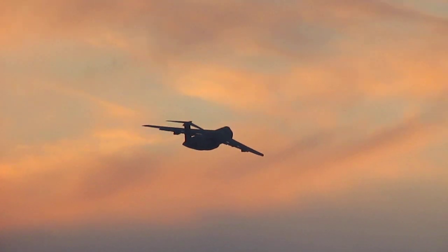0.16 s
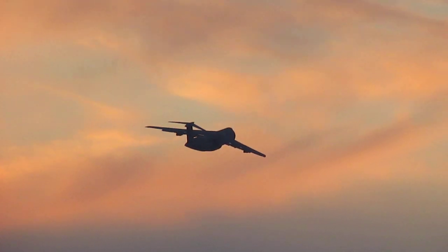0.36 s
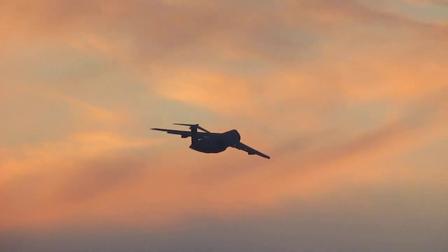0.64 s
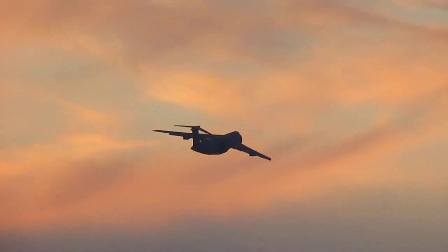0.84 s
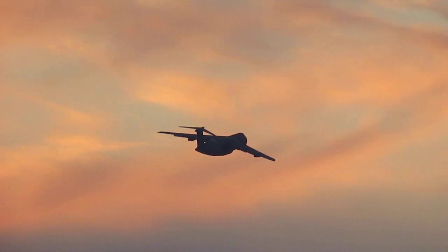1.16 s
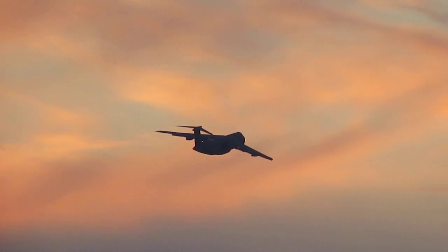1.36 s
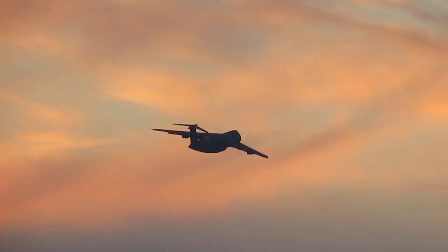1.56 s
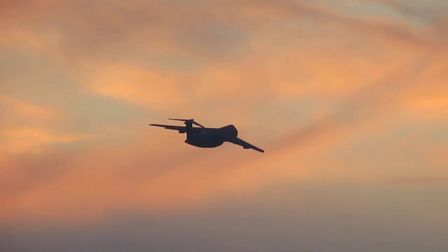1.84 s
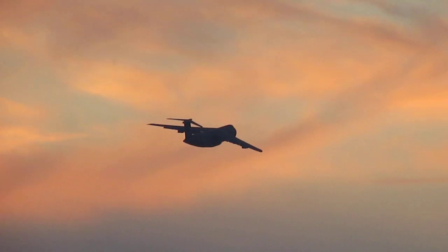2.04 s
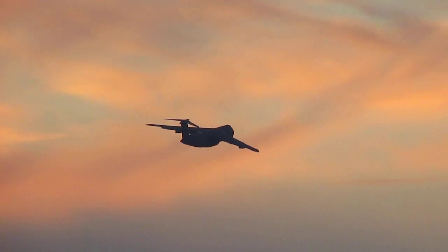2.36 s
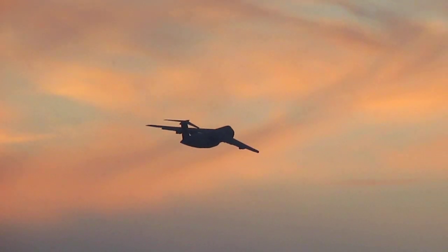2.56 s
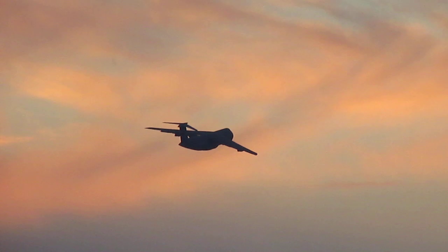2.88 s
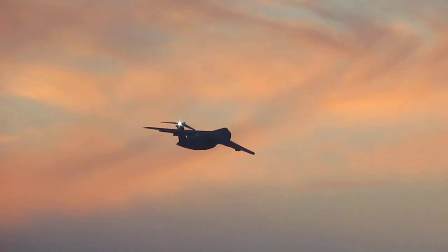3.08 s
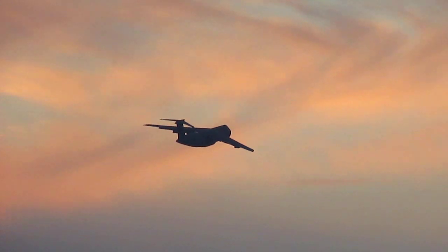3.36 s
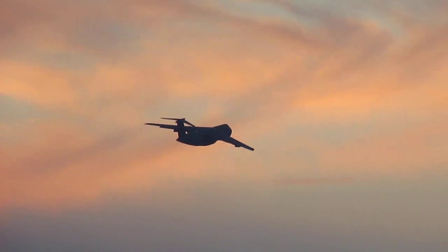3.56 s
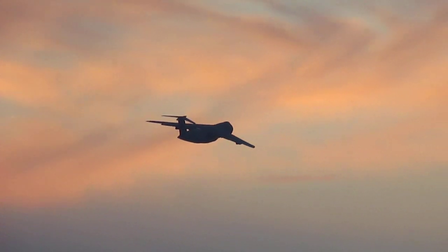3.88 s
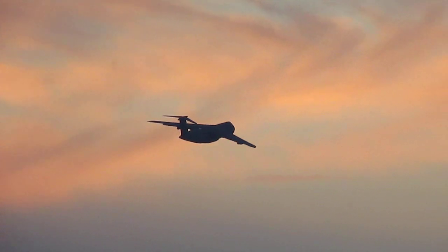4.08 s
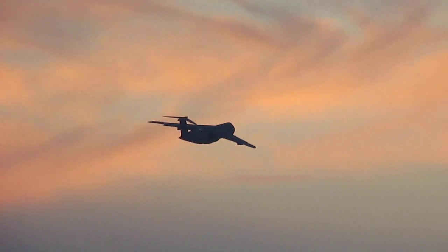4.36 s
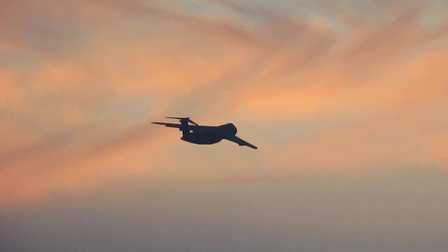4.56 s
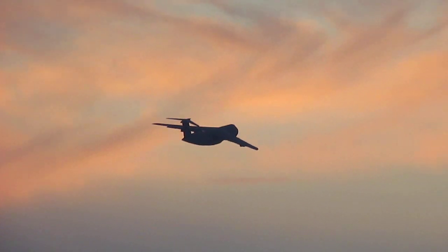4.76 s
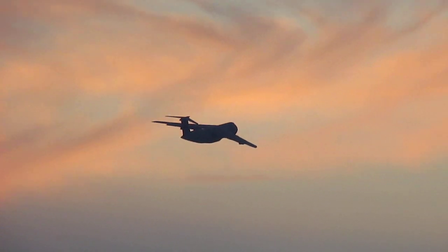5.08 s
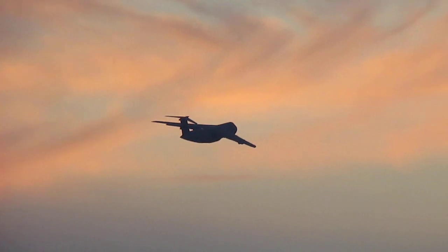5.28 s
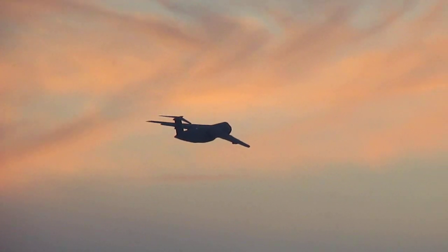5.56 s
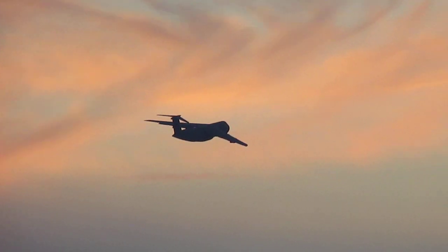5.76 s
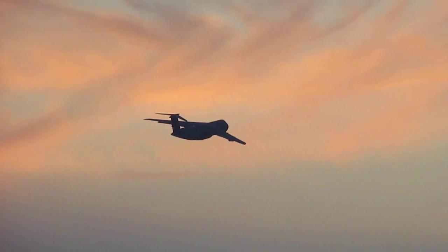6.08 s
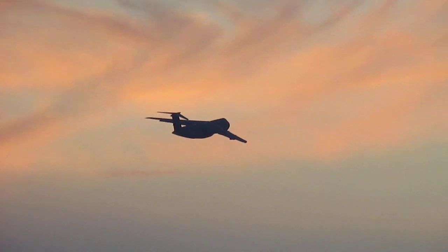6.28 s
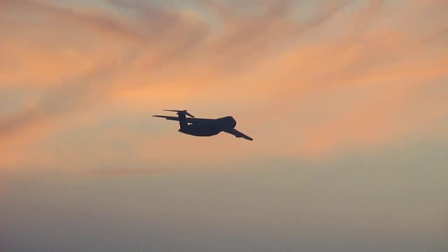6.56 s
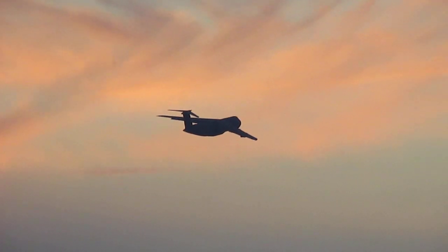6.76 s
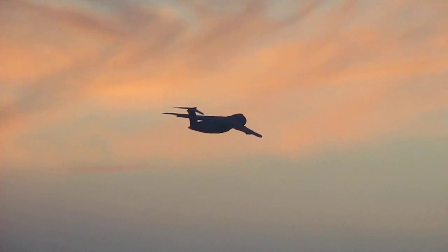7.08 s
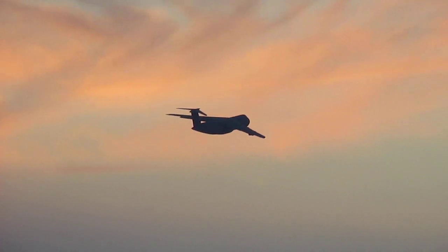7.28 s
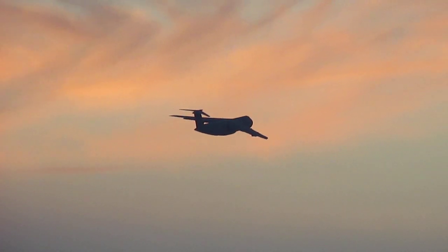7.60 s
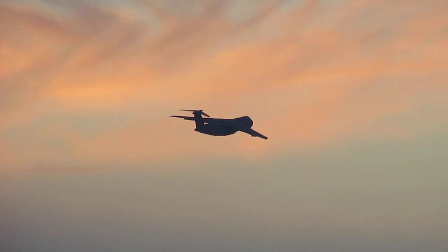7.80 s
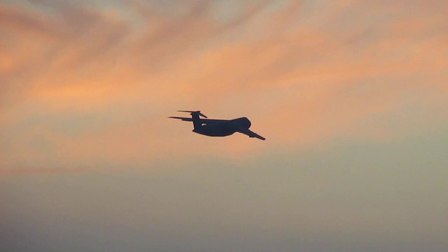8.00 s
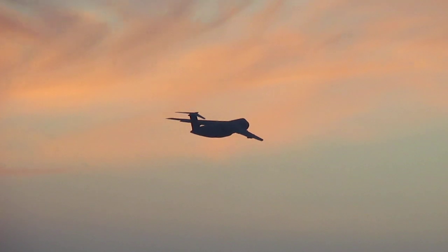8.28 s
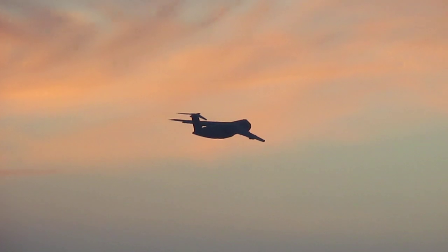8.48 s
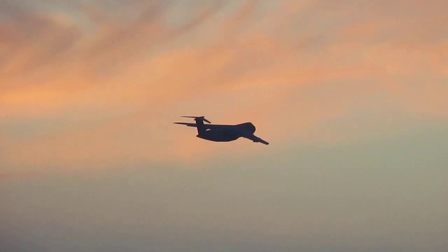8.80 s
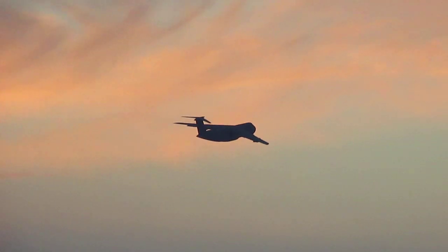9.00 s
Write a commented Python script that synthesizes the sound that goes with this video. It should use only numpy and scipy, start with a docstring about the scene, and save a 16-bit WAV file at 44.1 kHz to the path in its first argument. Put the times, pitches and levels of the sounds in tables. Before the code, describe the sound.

A big jet climbs away with a dull roar, deep rumble and faint whine, while wind gusts buffet the microphone.

```python
"""Jet climbing away at dusk

A big four-engine jet leaves an airfield: its dull exhaust roar and faint fan whine swell and recede,
leaving a distant hiss. Gusts buffet the microphone, the hardest ducking its gain control. A breeze
hisses through dry grass, in which stalks tick and crickets buzz. The hand-held camera knocks and clicks."""
import sys
import numpy as np
from scipy import signal
from scipy.fft import rfft, irfft, next_fast_len
from scipy.io import wavfile
from scipy.ndimage import uniform_filter1d

SR = 44100
rng = np.random.default_rng(int(sys.argv[2]) if len(sys.argv) > 2 else 0)


def dump_mix(stems):
    """Bounce the given channels to the path in sys.argv[1] as a 16-bit WAV at rate SR."""
    frames = np.atleast_2d(stems).T  # one column per channel
    limited = np.clip(frames, -1, 1)  # hard clip at full scale
    pcm = np.round(limited * 32767).astype(np.int16)
    wavfile.write(sys.argv[1], SR, pcm)


N = 403074
TIME = np.arange(N) / SR


def from_db(db):
    """Decibels to gain."""
    return 10 ** (np.asarray(db) / 20)


def rms_one(x):
    """Scale to unit power."""
    return x / np.sqrt(np.mean(x ** 2) + 1e-20)


def swell(peak_s, rise_s, fall_s):
    """Gaussian bell of height 1 with its own rise and fall."""
    return np.exp(-.5 * ((TIME - peak_s) / np.where(TIME < peak_s, rise_s, fall_s)) ** 2)


def panned(pan_db):
    """Stereo gains; pan_db is left minus right."""
    return from_db(np.array([[.5], [-.5]]) * pan_db)


def at_hz(points, hz):
    """Read a table on a log-frequency axis."""
    points_hz, values = np.transpose(points)
    return np.interp(np.log(hz + 1e-3), np.log(points_hz), values)


def drift(rate_hz):
    """Slow random wander; rms 1."""
    pole = np.exp(-80 * np.pi * rate_hz / SR)
    slow = signal.lfilter([1], [1, -2 * pole, pole * pole], rng.standard_normal(N // 40 + 2002))[2000:]
    return np.interp(np.arange(N) / 40, np.arange(len(slow)), rms_one(slow))


def turbulence(colour, coherence, lag_s=0):
    """Stereo noise from (Hz, dB) colour and (Hz, left-right coherence) points, left lag_s late; rms 1."""
    size = next_fast_len(N)
    hz = np.arange(size // 2 + 1) * SR / size
    mid, side = rfft(rng.standard_normal((2, size)))
    alike = np.clip(at_hz(coherence, hz), -1, 1)
    pair = np.sqrt(1 + alike) * mid + np.sqrt(1 - alike) * side * [[1], [-1]]
    pair[0] *= np.exp(-2j * np.pi * hz * lag_s)
    return rms_one(irfft(pair * from_db(at_hz(colour, hz)), size)[:, :N])


def wavering_tone(hz, wander_hz, flutter_db):
    """Machine tone through moving air: pitch wanders, level flutters; rms 1."""
    phase = 2 * np.pi * np.cumsum(hz + wander_hz * drift(5.96)) / SR
    return rms_one(from_db(flutter_db * drift(5.5)) * np.sin(phase))


def blurred_tone(hz, width_hz):
    """Tone broadened by wandering amplitude and phase; rms 1."""
    phase = 2 * np.pi * hz * TIME
    return rms_one(drift(width_hz) * np.cos(phase) + drift(width_hz) * np.sin(phase))


def moving_band(centre_hz, width_hz):
    """Noise band around a moving centre; rms 1."""
    lowpass = signal.butter(2, width_hz / 2, fs=SR, output="sos")
    slow = signal.sosfilt(lowpass, rng.standard_normal((2, N)))
    phase = 2 * np.pi * np.cumsum(centre_hz) / SR
    return rms_one(slow[0] * np.cos(phase) + slow[1] * np.sin(phase))


def decays(events, t60_s, rise_samples):
    """Envelope that rises at each (s, dB) event and dies away."""
    kicks = np.zeros(N)
    for at_s, db in events:
        kicks[min(round(at_s * SR), N - 1)] = from_db(db)
    pole = from_db(-60 / (t60_s * SR))
    return uniform_filter1d(signal.lfilter([1], [1, -pole], kicks + 1e-18), rise_samples)


def exhaust():
    """Large eddies rumble, small ones roar; both swell as their beams sweep by and flutter in the air."""
    # Each row: frequency in Hz, relative density in dB.
    roar_colour = [(150, -10), (330, -0.5), (400, -1.5), (510, 1), (680, -2), (780, -2), (1000, -4.5),
                   (1250, -8.5), (1550, -14.5), (1750, -15), (2100, -25), (3000, -32), (4500, -48.5),
                   (9000, -67.5)]
    rumble_colour = [(15, -24.5), (30, -3), (45, -2), (60, 2.5), (100, -3.5), (125, -0.5), (160, -5),
                     (200, -4), (260, -9.5), (330, -13), (450, -27), (800, -68)]
    # Each row: frequency in Hz, left-right coherence.
    coherence = [(60, 1), (250, 0.96), (450, 0.91), (750, 0.88), (1200, 0.79), (2000, 0.52), (3300, .05)]
    # Faint engine drones. Each row: pitch in Hz, level against the roar in dB.
    drone_tones = [(475, -22.5), (502, -21), (515, -19), (594, -16), (773, -17.5)]
    roar_db = -30 + 2 * swell(peak_s=4.84, rise_s=1.25, fall_s=1.78)
    rumble_db = -27.5 + 6.5 * swell(peak_s=5.3, rise_s=1.58, fall_s=4.0)
    roar = from_db(roar_db + 0.55 * drift(3.9)) * turbulence(roar_colour, coherence, lag_s=9e-5)
    rumble = from_db(rumble_db + 0.42 * drift(7.8)) * turbulence(rumble_colour, coherence, lag_s=8e-5)
    drones = sum(from_db(roar_db + db) * wavering_tone(hz, wander_hz=4.42, flutter_db=3.0)
                 for hz, db in drone_tones)
    return (roar + drones) * panned(0.17) + rumble * panned(1.0)


def fans():
    """Four fans at nearly the same speed beat; their beamed whine sweeps over the listener."""
    # Each row: pitch in Hz, relative level in dB.
    blade_tones = [(1067, -7.5), (1070, -2.5), (1080, -4.5), (1084, -16.5)]
    # Moving air briefly focuses the whine. Each row: time in seconds, half length in seconds, gain in dB.
    focusings = [(2.134, 0.16, 9), (3.2, .2, 3.5), (4.34, 0.1, 6), (5.2, 0.28, 5.5)]
    level_db = -52.5 + 11 * swell(peak_s=4.6, rise_s=2.0, fall_s=1.6)
    focus_db = sum(db * swell(at_s, half_s, half_s) for at_s, half_s, db in focusings)
    whine = sum(from_db(db) * wavering_tone(hz, wander_hz=1.633, flutter_db=3.1) for hz, db in blade_tones)
    return from_db(level_db + focus_db) * whine * panned(.2)


def wind():
    """Wind buffets the microphone with a wide, low rumble; strong eddies thump it briefly."""
    # Each row: time in seconds, half length in seconds, level in dB, pan in dB.
    gusts = [(1.78, 0.075, -25, 6), (2.312, 0.22, -20.5, -5), (2.625, 0.13, -19.5, -8.5),
             (3.34, 0.085, -31, 7), (3.888, 0.044, -30, 9), (4.483, 0.041, -18.5, -3),
             (4.826, 0.13, -27.5, 13), (5.29, 0.13, -26.5, 10), (5.85, 0.084, -27.5, 13),
             (6.177, 0.12, -28.5, 6), (6.7, 0.076, -38, 6), (7.6, .15, -40, 2), (8.05, 0.17, -25.5, 5),
             (8.355, 0.1, -14, 1), (8.736, 0.13, -15, 4), (9.14, 0.054, -19.5, 10.5)]
    # Each row: frequency in Hz, relative density in dB.
    colour = [(10, -29), (20, -10), (48, 0.5), (90, 1.5), (150, -5.5), (225, -11.5), (300, -23), (500, -41),
              (1000, -44), (3000, -78)]
    # Each row: time in seconds, level in dB, pan in dB, pitch in Hz, half length in seconds.
    eddies = [(1.794, -13, 12.5, 112.3, .007), (2.138, -18, -10, 94, 0.013),
              (2.334, -11, -10.5, 121.2, .013), (2.435, -5.5, -9, 188.8, 0.0056),
              (4.696, -20.5, 14, 78, 0.023), (6.27, -29, 0, 117.5, .016), (8.308, -5, -4, 180, 0.009),
              (8.409, -15.5, -11.5, 219.7, 0.0057), (8.658, -8, -9, 180.8, 0.0053),
              (8.81, -10, 10.5, 215, .013), (9.131, -9, 18, 114.3, 0.009)]
    lull_db = -43.5
    power = (from_db(lull_db) * panned(4.0)) ** 2
    for at_s, half_s, db, pan_db in gusts:
        power = power + (from_db(db) * panned(pan_db) * swell(at_s, half_s, half_s)) ** 2
    envelope = np.sqrt(power) * from_db(0.47 * drift(30))
    buffeting = envelope * turbulence(colour, coherence=[(50, -.65), (400, -0.42)])
    for at_s, db, pan_db, hz, half_s in eddies:
        phase = 2 * np.pi * np.cumsum(hz * from_db(2.0 * drift(110.4))) / SR
        thump = np.sin(phase) + .5 * np.cos(1.7 * phase) + 0.21 * np.sin(2.4 * phase)  # eddy + whirls
        buffeting += from_db(db) * panned(pan_db) * [[1], [-1]] * swell(at_s, half_s, half_s) * thump
    return buffeting


def field_hiss():
    """Grass hisses in a breeze to the right; a distant hiss near 2.6 kHz remains as the jet recedes."""
    # Each row: frequency in Hz, relative density in dB.
    grass_colour = [(1000, -15), (2400, 1), (3500, 5), (4800, 2), (6200, 0.5), (7100, -2.5), (7900, -9),
                    (8400, -6), (9400, -11.5), (10500, -22), (13400, -15), (15500, -23)]
    # Puffs of air. Each row: time in seconds, half length in seconds, gain in dB.
    puffs = [(3.8, 0.14, 3.5), (4.3, .045, 4.5), (4.62, 0.064, 3.5), (5.42, .05, 2), (6.7, .06, 3),
             (7.3, 0.097, 3.5)]
    # Narrower hiss bands; the one near 2.6 kHz is the distant background.
    # Each row: peak time, rise and fall in seconds, centre in Hz, glide in Hz per second, level in dB.
    hiss_bands = [(5.29, .03, .04, 5100, 0, -54), (5.55, .13, .15, 7140, -200, -58),
                  (6.3, 0.65, .6, 6780, -550, -63.5), (8.3, 1.5, 1.3, 2597, -60, -56.5),
                  (8.7, .7, .5, 4800, 0, -67.5)]
    coherence = [(2000, .15), (3300, 0.78), (4300, 0.31), (6000, .3), (7900, 0.48), (11000, .3),
                 (14000, .05)]
    calm_db, breeze_db = -63.5, 12
    breeze = 0.69 * swell(peak_s=4.88, rise_s=0.67, fall_s=0.68)
    breeze += 0.5 * swell(peak_s=5.6, rise_s=0.57, fall_s=2.0)
    grass = turbulence(grass_colour, coherence, lag_s=0.00011)
    puff_db = sum(db * swell(at_s, half_s, half_s) for at_s, half_s, db in puffs)
    hiss = from_db(calm_db + breeze_db * breeze + puff_db + 0.87 * drift(14)) * grass
    for at_s, rise_s, fall_s, hz, glide_hz_per_s, db in hiss_bands:
        centre_hz = hz + glide_hz_per_s * (TIME - at_s)
        band = np.array([moving_band(centre_hz, width_hz=1160) for channel in range(2)])
        hiss += from_db(db + 2.4 * drift(8)) * swell(at_s, rise_s, fall_s) * band
    return hiss * panned(-3.4 * breeze)


def mic_hiss():
    """Steady microphone self-noise."""
    colour = [(1000, 9), (8000, 0.0), (10500, -3.5), (13500, 0.5), (15500, -6)]
    return from_db(-66) * turbulence(colour, coherence=[(1000, .05), (15000, .05)])


def stalks():
    """Dry stalks tick, each with a short rustle."""
    # Each row: time in seconds, relative level in dB.
    touches = [(0.7622, -52), (0.8515, -47), (0.9244, -61), (1.1278, -52), (1.2166, -49), (1.2844, -59),
               (1.9365, -52), (2.0248, -48.5), (2.2717, -48), (3.6426, -54), (3.7319, -47), (3.8044, -53),
               (4.5994, -46), (6.8698, -47)]
    colour = [(2000, -13), (4000, -1), (7500, -1), (9000, 0), (10500, -12), (13000, -9), (15500, -11)]
    tick = from_db(-5) * decays(touches, t60_s=.03, rise_samples=400)
    rustle = from_db(-8) * decays(touches, t60_s=0.3, rise_samples=900)
    return (tick + rustle) * turbulence(colour, coherence=[(4000, 0), (12000, 0)]) * panned(-2.5)


def wing_tone(hz, width_hz):
    """A cricket's wing resonates in a narrow line; its file scrapes a rasp around it; rms 1."""
    return rms_one(blurred_tone(hz, width_hz) + from_db(-5) * blurred_tone(hz, width_hz=170))


def crickets():
    """Fluttering trills arrive directly and scattered by the grass."""
    # Each row: start and end in seconds, pitch in Hz, level in dB, line width in Hz,
    # scattered against direct sound in dB, pan in dB.
    trills = [(1.0, 1.35, 9300, -76, 90, 2, 4), (1.4, 2.3, 9270, -72, 100, 2, 4),
              (2.25, 2.75, 9040, -73, 98, 2, -1), (6.51, 6.92, 9060, -49.5, 12, -14, 2),
              (7.0, 7.756, 9050, -56, 10.7, -6, 0), (8.45, 8.755, 9000, -77, 30, 0, 1.5)]
    attack_s, release_s, flutter_db = 0.059, 0.17, 1.7
    song = np.zeros((2, N))
    for start_s, end_s, hz, db, width_hz, scatter_db, pan_db in trills:
        gate = np.exp(np.minimum(TIME - start_s, 0) / attack_s - np.maximum(TIME - end_s, 0) / release_s)
        direct = wing_tone(hz, width_hz) * panned(pan_db)
        scattered = from_db(scatter_db) * wing_tone(hz, width_hz) * [[1], [-1]]
        song += gate * from_db(db + flutter_db * drift(15)) * (direct + scattered)
    return song


def camera_knock():
    """A hollow knock rings the camera body in a few modes."""
    # Each row: time in seconds, level in dB.
    impacts = [(1.168, -16.5), (1.177, -18)]
    # Each row: frequency in Hz, gain in dB, T60 in seconds.
    modes = [(822, 1, 0.059), (910, -12, .03), (660, -16, .025)]
    ring = np.zeros(N)
    for at_s, db in impacts:
        age_s = np.maximum(TIME - at_s, 0)
        for hz, mode_db, t60_s in modes:
            decay_db = 60 * np.minimum(age_s / t60_s, 2)
            ring += from_db(db + mode_db - decay_db) * np.sin(2 * np.pi * hz * age_s)
    bandpass = signal.butter(2, [500, 1200], "band", fs=SR, output="sos")
    return signal.sosfilt(bandpass, ring) * panned(-1.5)


def camera_click():
    """A sharp click on the plastic body."""
    # Each row: time in seconds, level in dB.
    clicks = [(9.0855, -18.5)]
    colour = [(800, -1), (2000, 2), (4600, 0), (8500, -13.5), (10500, -19), (13500, -21), (15000, -36)]
    plastic = turbulence(colour, coherence=[(2000, .2), (9000, 0.19)])
    return decays(clicks, t60_s=0.012, rise_samples=50) * plastic * panned(-5)


def scene():
    """The receding jet, wind, field and camera over microphone hiss."""
    recede_db_per_s = 0.2429
    jet = from_db(-recede_db_per_s * TIME) * (exhaust() + fans())
    outdoors = jet + wind() + field_hiss() + stalks() + crickets()
    return outdoors + camera_knock() + camera_click() + mic_hiss()


def gain_control(x):
    """A blast on either channel turns both down; the gain creeps back."""
    threshold_db, attack_s, recover_db_per_s = -8.2, .008, 4
    power = uniform_filter1d(x ** 2, size=660, axis=1).max(axis=0)
    level_db = 10 * np.log10(np.maximum(power, 1e-12))
    excess_db = np.maximum(level_db - threshold_db, 0)
    recovery_db = recover_db_per_s * TIME
    duck_db = np.maximum.accumulate(excess_db + recovery_db) - recovery_db
    pole = np.exp(-1 / (attack_s * SR))
    return x * from_db(-signal.lfilter([1 - pole], [1, -pole], duck_db))


def record(dry):
    """Gain control, then a steep low-pass."""
    cutoff_hz = 15750
    return signal.sosfilt(signal.ellip(12, .1, 90, cutoff_hz, fs=SR, output="sos"), gain_control(dry))


dry = scene()
out = record(dry)
dump_mix(out)
```